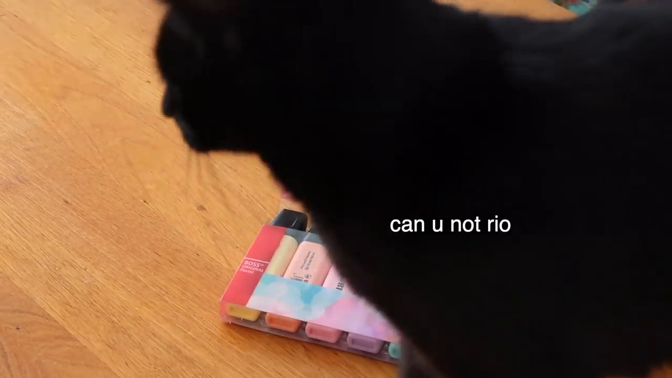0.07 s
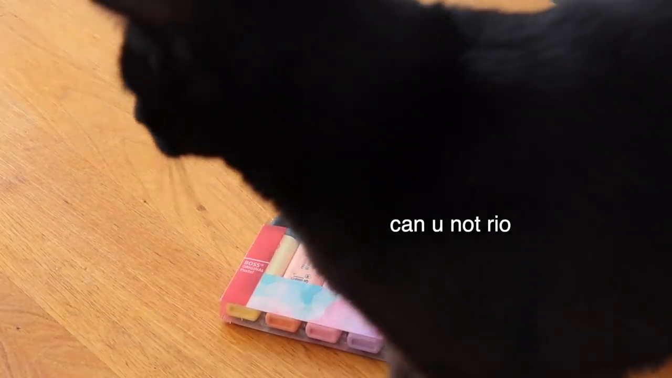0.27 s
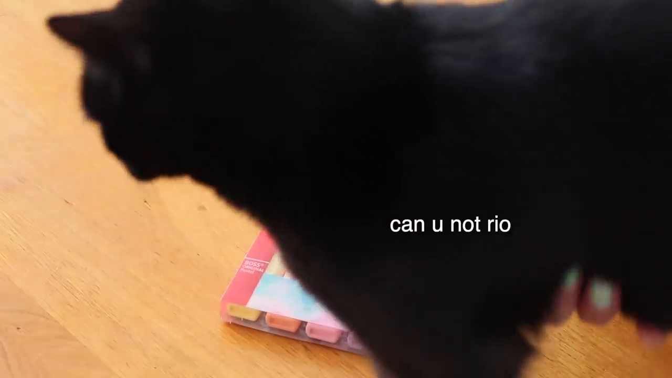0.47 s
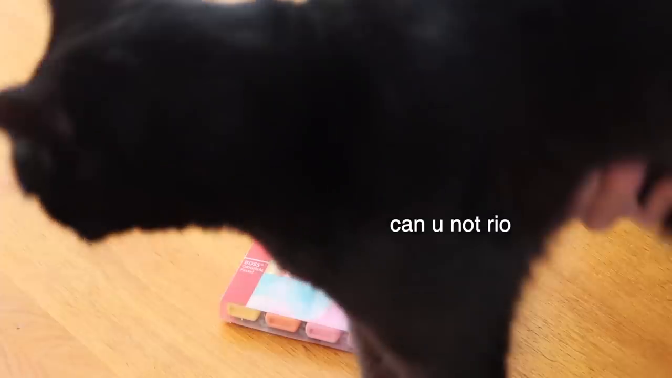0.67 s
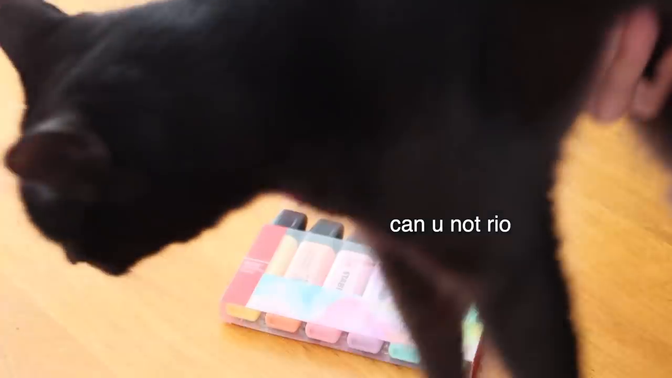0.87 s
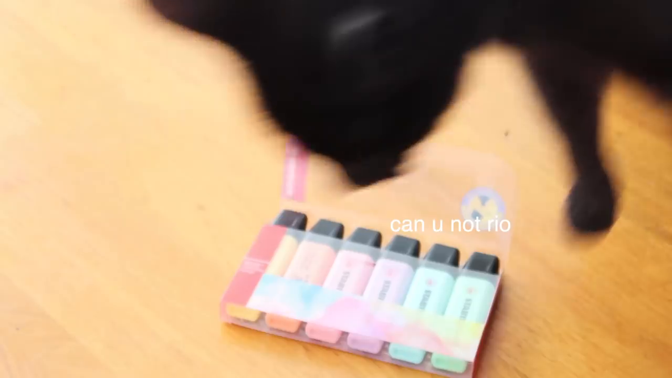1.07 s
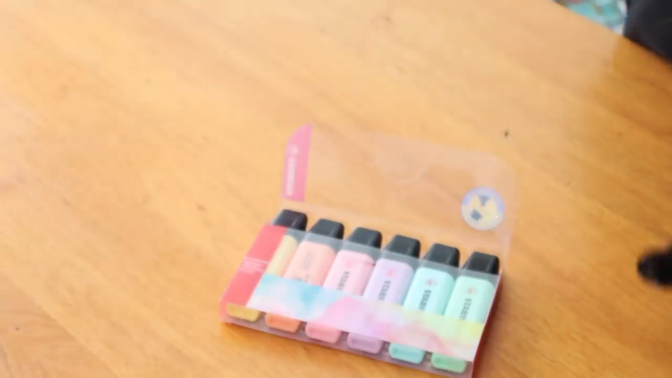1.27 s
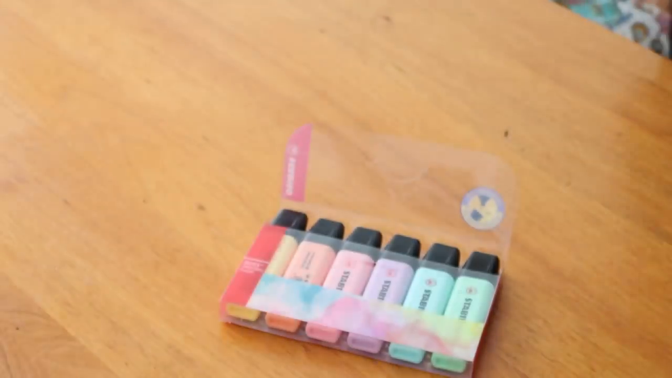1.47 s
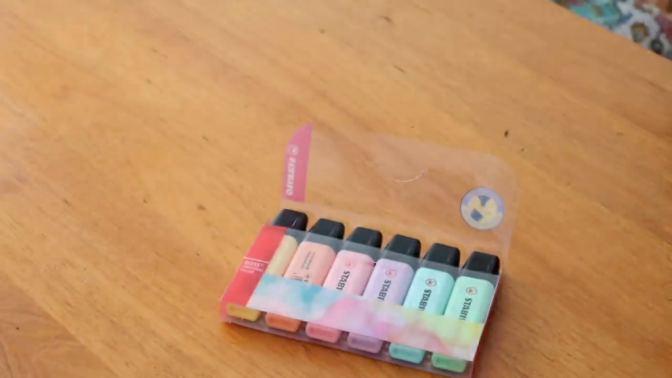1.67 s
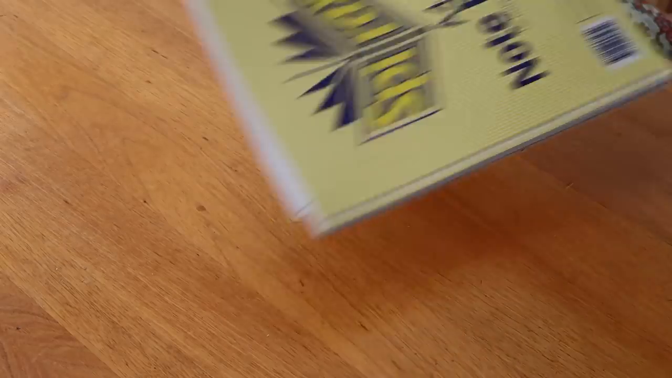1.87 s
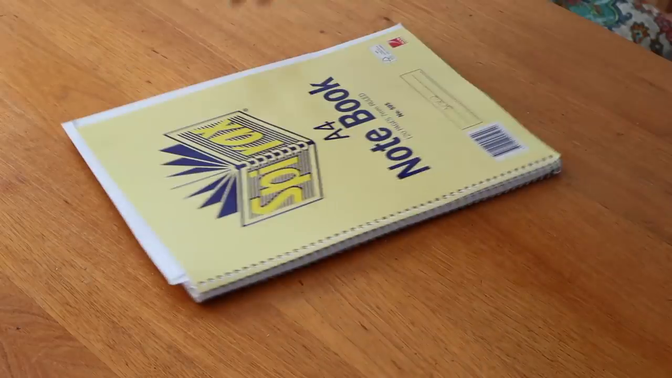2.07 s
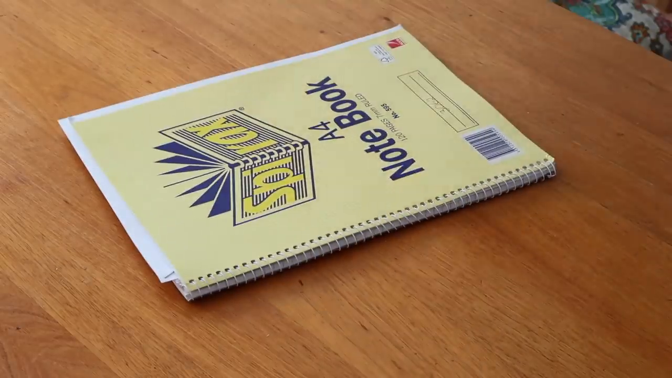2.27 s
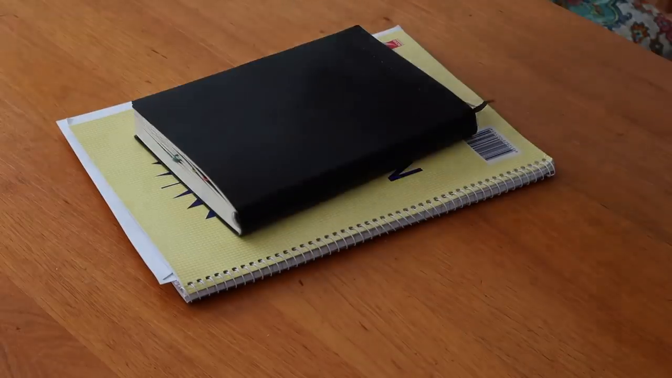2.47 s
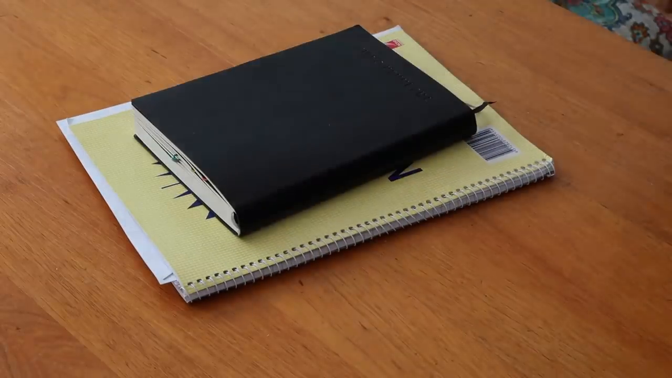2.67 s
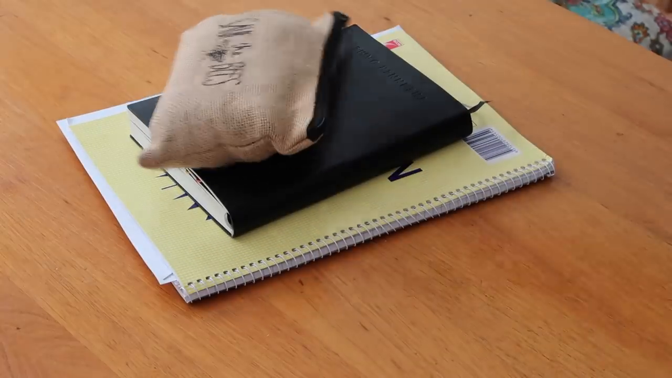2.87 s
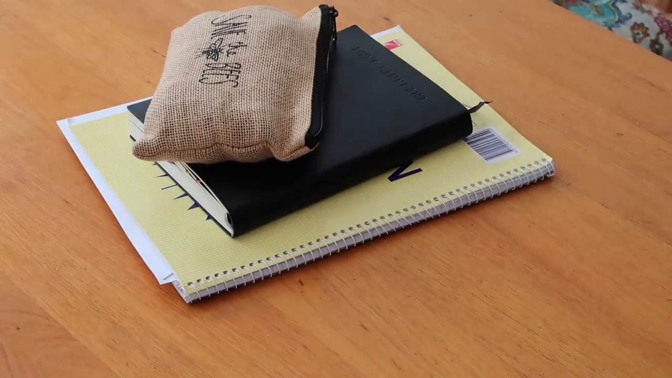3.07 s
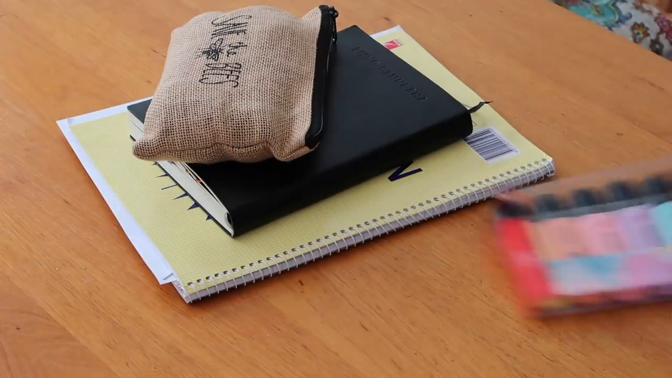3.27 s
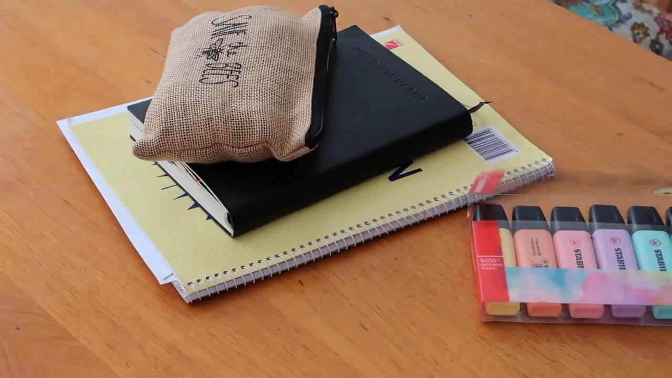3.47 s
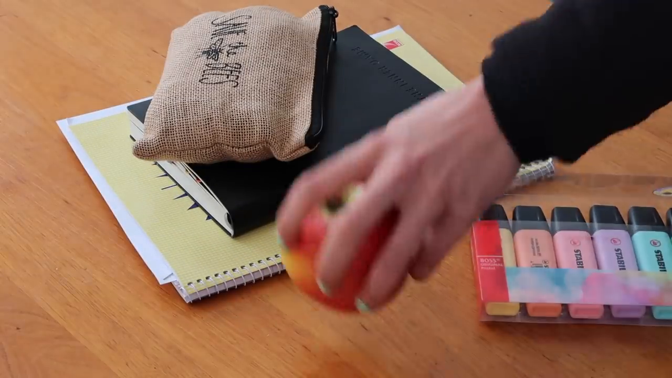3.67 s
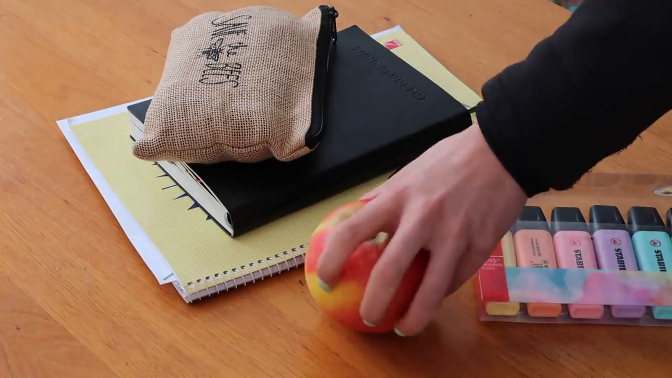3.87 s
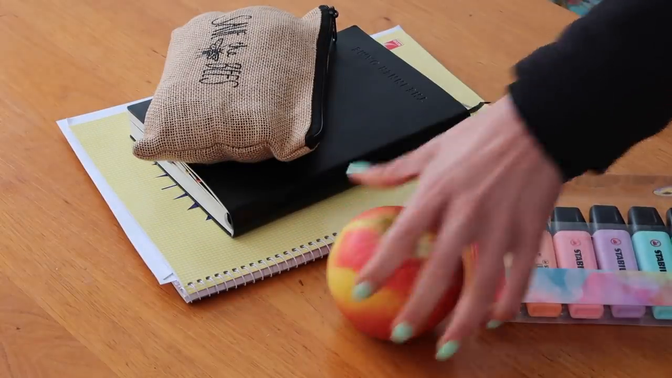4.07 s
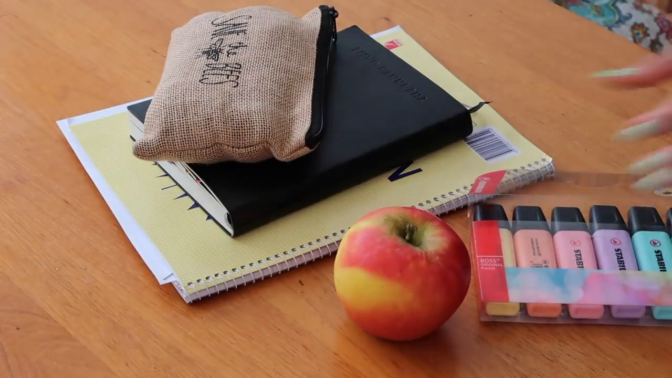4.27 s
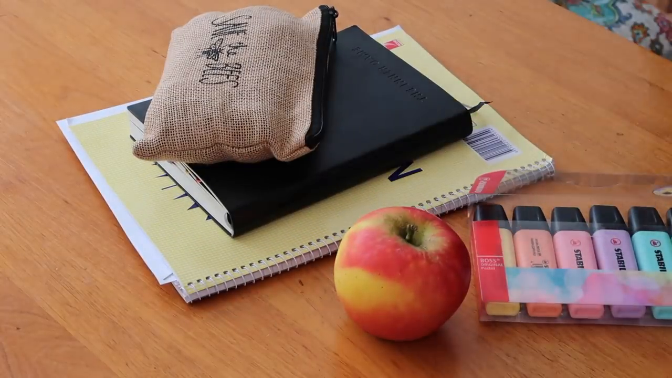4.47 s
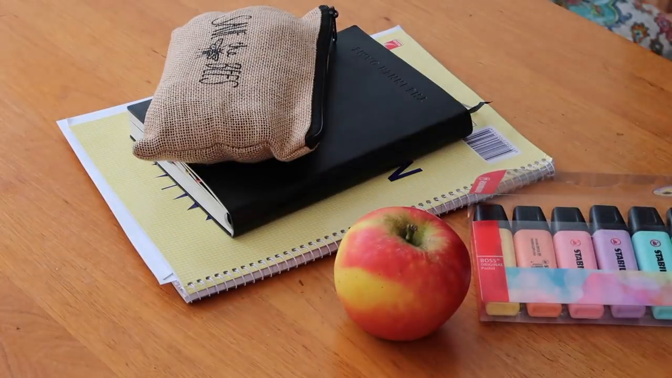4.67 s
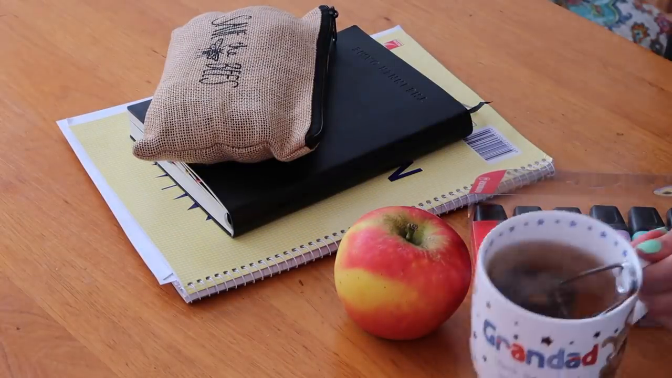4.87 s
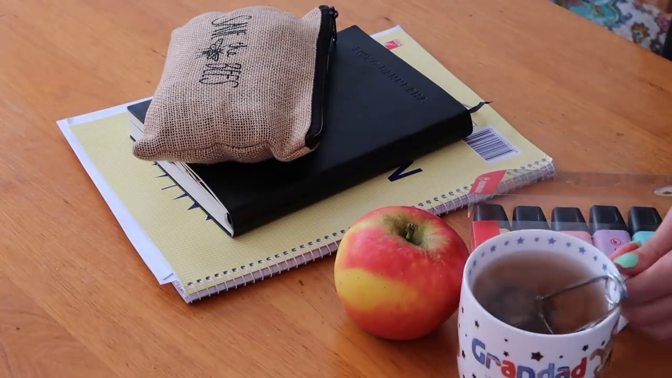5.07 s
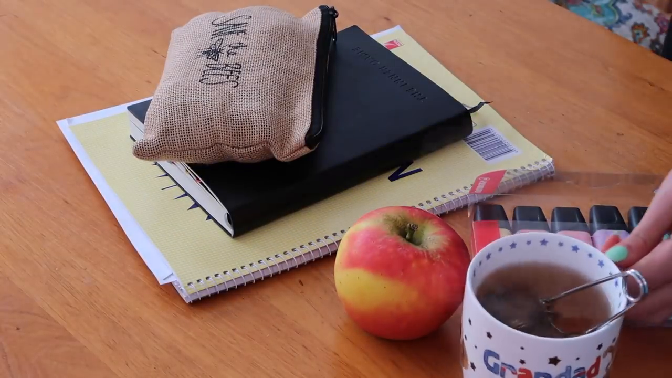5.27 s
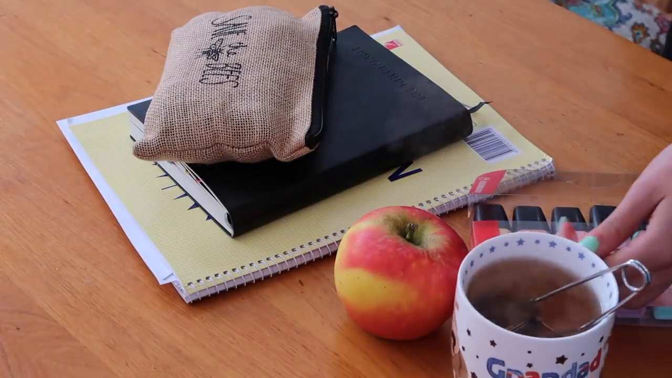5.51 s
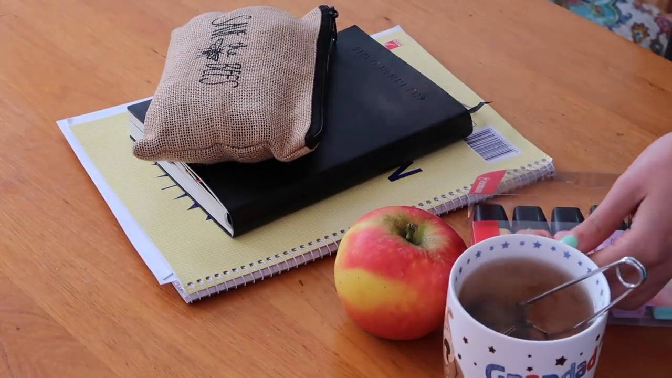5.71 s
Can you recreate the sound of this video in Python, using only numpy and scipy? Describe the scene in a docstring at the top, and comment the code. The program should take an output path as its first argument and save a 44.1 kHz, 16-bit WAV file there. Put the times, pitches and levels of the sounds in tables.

```python
"""Over quiet room air, fur and cloth rustle, a faint squeak rises and a cat leaves a wooden table with a thump.
A low hum sets in; a spiral notebook, a hardback, a pouch of pencils and a plastic case of markers are put down.
An apple lands and rocks to rest, the table is bumped, and a mug of tea lands with a very faint high hiss. Each
blow is a coloured click with a rattle; it rings modes of the table top and fills a small live room. Air and
rustle are coloured noise, the squeak is fuzzy harmonics and the hum is a sine."""
import sys
import numpy as np
from scipy import signal
from scipy.fft import rfft, irfft
from scipy.io import wavfile
from scipy.ndimage import uniform_filter1d

SR = 44100
rng = np.random.default_rng(int(sys.argv[2]) if len(sys.argv) > 2 else 0)


def persist_wave(psi):
    """Save psi, clipped to +-1, as 16-bit WAV."""
    counts = np.round(np.clip(psi, -1, 1) * 32767).astype(np.int16)
    wavfile.write(sys.argv[1], SR, np.atleast_2d(counts).T)


N = 253134

# Colours of the room air and of brushing fur and cloth.
# Each row: frequency in Hz, relative level in dB per Hz.
AIR_COLOUR = [(15, -40), (25, -2), (193, 1), (399, -7), (445, -6.5), (537, -10.5), (648, -10.5),
              (782, -14.5), (1490, -14.5), (5580, -26), (10600, -37), (13500, -48.5), (15500, -84.5)]
BRUSH_COLOUR = [(200, -22), (350, -1.5), (700, 4.5), (2600, 4.5), (4500, -3.5), (7000, -11), (10000, -21.5),
                (13000, -23.5), (15500, -54)]
# Stereo width of room air and rustle. Each row: frequency in Hz, side minus mid in dB.
AIR_WIDTH = [(60, -24), (110, -21), (200, -10.5), (380, -2), (700, -4.5), (1290, -5.5), (2380, -7),
             (4400, -1), (8120, 1.5), (15000, 13)]
# Loudness of a low machine hum. Each row: time in seconds, rms level in dB.
HUM_LEVEL = [(1.85, -46.5), (3.0, -48.5), (3.7, -44.5), (4.9, -42), (5.3, -53)]
# Strokes of fur, sleeves and cloth.
# Each row: peak time in seconds, level in dB, rise in seconds, fall in seconds.
STROKES = [(.05, -52, 0.072, 0.037), (.35, -47.5, 0.13, 0.14), (.72, -59, .03, 0.058),
           (1.33, -46, 0.29, 0.15), (1.73, -51, 0.086, 0.19), (2.66, -50, 0.022, 0.16),
           (2.828, -41, 0.019, 0.017), (4.6, -44, 0.12, .08), (4.8, -50.5, 0.056, 0.095),
           (5.06, -55, 0.061, 0.044)]
# A faint rising squeak, perhaps from the cat as it is lifted.
# Each row: time in seconds, pitch in Hz, level in dB.
SQUEAK_GLIDE = [(.84, 419, -59.5), (.92, 463, -53.5), (.97, 487.5, -46.5), (1.02, 537, -46.5),
                (1.12, 573, -55.5), (1.2, 595, -72.5)]

# Stereo width of the reflections. Each row: frequency in Hz, side minus mid in dB.
ROOM_WIDTH = [(60, -39), (110, -44.5), (200, -24), (380, -20.5), (700, -22.5), (1290, -18), (2380, -13.5),
              (4400, -4.5), (8120, 3.5), (15000, 20)]
# Decay of the room. Each row: frequency in Hz, time to fall 60 dB in seconds.
ROOM_T60 = [(100, 0.2), (260, 0.57), (700, 0.51), (1800, 0.45), (5000, 0.47), (12000, 0.31)]
# Modes of the table top, before each object's own drive level.
# Each row: frequency in Hz, gain at the peak in dB, time to fall 60 dB in seconds.
TABLE_MODES = [(110.6, 12.5, 0.51), (141.5, -4, 1), (179.4, -4.5, 0.19), (245.8, -3.5, 0.17),
               (274.2, 1, 0.36), (365.6, 2, 0.081), (437.2, 4.5, 0.25), (519, -2.5, 0.36), (573, 0.5, .3),
               (703, -2, 0.93), (784, 1, 0.3), (913, -4, 0.21), (984, -9.5, 0.56)]

# Colour of each object's blow, before its brightness tilt.
# Each row: frequency in Hz, relative level in dB per Hz.
CAT_COLOUR = [(21, -33), (35, -3), (119, 16), (147, -19), (209, -47), (300, -33), (390, -51.5), (660, -120)]
NOTEBOOK_EDGE_COLOUR = [(47, -40), (80, -12), (205, -2.5), (441, -1.5), (669, -2), (1440, -9.5),
                        (1680, -11.5), (3170, -12.5), (3540, -17.5), (12300, -41.5), (15000, -51)]
NOTEBOOK_SLAP_COLOUR = [(60, -40), (170, -12), (240, -32), (440, -11), (590, -7), (800, -15.5),
                        (1300, -2.5), (1800, -2.5), (2400, -7.5), (3100, -8.5), (4200, -15.5),
                        (5800, -14.5), (11000, -29.5), (15500, -50)]
NOTEBOOK_CRACK_COLOUR = [(200, -22), (800, -12.5), (1600, -16.5), (2050, -4.5), (2340, 1), (2700, -6.5),
                         (3600, -16), (4600, -24), (5340, -18), (6200, -24), (11000, -32.5), (15500, -29)]  # the cover cracks against the wood
HARDBACK_EDGE_COLOUR = [(35, -14.5), (60, -6.5), (156, 5.5), (253, -4), (721, -9.5), (1630, -18.5),
                        (2910, -25), (3190, -27), (3500, -26), (4630, -29), (5980, -39.5), (12900, -52),
                        (15500, -57)]
HARDBACK_FLAT_COLOUR = [(29, -46), (50, -20.5), (114, 0.5), (238, -2), (313, -6), (462, -5.5), (568, -18),
                        (839, -19), (1300, -20.5), (1790, -27), (2010, -28), (5020, -54), (9110, -88),
                        (9760, -81), (12000, -63), (15600, -100), (22000, -120)]
POUCH_COLOUR = [(41, -38.5), (70, -6.5), (103, -10), (135, -14.5), (222, -7.5), (350, -15.5), (449, -4),
                (515, -15.5), (740, -13), (971, -20), (1220, -12.5), (2350, -3.5), (6240, -16.5),
                (13200, -23), (15800, -47)]
CASE_CORNER_COLOUR = [(90, -23.5), (200, -13), (380, -5), (1000, -6.5), (1300, -2), (1550, 2), (1900, -5.5),
                      (2400, -6), (3100, -15), (5200, -22.5), (8000, -34.5), (13000, -38.5), (15500, -55)]
CASE_FLAT_COLOUR = [(53, -46.5), (90, -19.5), (216, -16), (354, -7), (532, -5.5), (592, -2), (645, -8.5),
                    (688, -6.5), (1170, -10.5), (1310, -9), (2330, -12), (5850, -26), (10200, -38.5),
                    (12400, -34), (15000, -72)]
CASE_LID_COLOUR = [(2500, -35), (4200, -5), (5000, -0.5), (6300, -4), (7000, -33.5), (12000, -15.5),
                   (16000, -25)]
APPLE_COLOUR = [(35, -34.5), (70, -17.5), (105, -4.5), (155, -3), (210, -11.5), (290, -15), (380, -23.5),
                (520, -23.5), (860, -37), (1400, -40), (2200, -50.5), (3700, -63), (7000, -78.5)]
APPLE_ROCK_COLOUR = [(45, -37), (90, -8), (180, -4), (230, -17.5), (370, -21), (520, -27), (900, -40.5),
                     (1400, -46.5), (2500, -54.5), (5000, -76)]
BUMP_COLOUR = [(35, -45), (60, -29), (109, 4), (206, -26), (249, -12.5), (339, -29.5), (1290, -40),
               (2000, -39), (2600, -58), (4400, -120)]
MUG_COLOUR = [(50, -48), (110, -14), (175, -6.5), (215, -11), (260, 0), (400, -4.5), (620, -5), (880, -6.5),
              (1050, -13), (1400, -14.5), (2000, -23.5), (2600, -30.5), (3100, -43), (5000, -65),
              (8000, -85)]
HIGH_HISS_COLOUR = [(4500, -29), (5100, 4), (5850, -4), (6700, -29), (8500, -6), (11000, -14), (14500, -10),
                    (16000, -37)]
# The blows; flat things touch with an edge, then fall flat.
# Each row: start in seconds, level of the main contact in dB, brightness in dB per octave,
# rattle in dB relative to the main contact, what lands.
BLOWS = [ (1.378, -34.5, 8.5, -11.5, "cat"), (1.392, -43, -23, 4, "cat"),
         (1.987, -48, 3, -3, "notebook edge"), (2.031, -35, 1.5, 3, "notebook edge"),
         (2.046, -35.5, 1.5, 3.5, "notebook edge"), (2.120, -27.5, -4.5, 1.5, "notebook slap"),
         (2.1237, -24.5, -0.5, -12, "notebook slap"), (2.1283, -19.5, .5, 1.5, "notebook slap"),
         (2.1272, -13.5, -0.5, -4.5, "notebook crack"), (2.446, -24.5, 1.5, 4.5, "hardback edge"),
         (2.457, -20.5, 1, -5.5, "hardback edge"), (2.4855, -21.5, -0.15, -3, "hardback edge"),
         (2.4872, -11.5, 0, -16, "hardback flat"), (2.499, -15, -1.2, -6.5, "hardback flat"),
         (2.844, -22, -1, 2, "pouch"), (2.8515, -20, 0, 4.5, "pouch"), (2.8595, -17.5, 1.2, 0.5, "pouch"),
         (3.031, -35, 1.5, 2.5, "pouch"), (3.185, -39.5, 0.5, 1, "case corner"),
         (3.2376, -21.5, 1, -2, "case corner"), (3.253, -30, .5, 6, "case corner"),
         (3.314, -29.5, -0.1, 0.5, "case corner"), (3.356, -30, 2.5, 3.5, "case corner"),
         (3.3705, -23, -1, -17.5, "case lid"), (3.3708, -18.5, -2, 3.5, "case flat"),
         (3.392, -23, -0.5, 6, "case flat"), (3.424, -20, 1, -2.5, "case flat"),
         (3.827, -14.5, 0.9, -8.5, "apple"), (3.834, -12.5, -0.05, -4, "apple"),
         (3.855, -15.5, .4, -19.5, "apple"), (3.889, -21, 0.45, -9.5, "apple"), (4.28, -35, 1, -2, "apple"),
         (4.793, -27.5, 0, 0.5, "table bump"), (4.822, -34, 0.5, -5, "table bump"),
         (4.85, -39, -1, -8, "table bump"), (5.0936, -7, 0.8, -12, "mug"), (5.096, -20, 0.6, -5.5, "mug"),
         (5.1068, -19, -0.4, -14, "mug"), (5.126, -24, 0.5, 4.5, "mug"), (5.145, -25.5, -2.5, -2, "mug"),
         (5.164, -57.5, 2, 2, "infuser"), ]

AIR_DB = -50.5
HUM_HZ, HUM_START_S = 48.8, 1.825
# the apple rocks to rest, each swing shorter and weaker than the one before
ROCK_START_S, ROCK_GAP_S = 4.131, 0.17
ROCK_SHRINK = 0.88  # each gap as a share of the one before
ROCK_DB, ROCK_LOSS_DB = -25, 7.5  # first swing, and loss per swing
ROCK_LOBE_S = 0.036  # from the first lobe's touch to the second
ROCK_TILT_DB, ROCK_LOBE_TILT_DB = 0.45, -1.4  # dB per octave; the second touch is duller
ROCK_RATTLE_DB = -4
BAND_LIMIT_HZ = 15900


def amp(db):
    """Decibels to gain."""
    return 10 ** (np.asarray(db) / 20)


def unit(x):
    """Scales to rms 1."""
    return x / np.sqrt(np.mean(x ** 2) + 1e-20)


def read(points, hz):
    """Reads a table on a log-frequency axis."""
    f, value = np.transpose(points)
    return np.interp(np.log(hz + 1), np.log(f + 1), value)


def add(mix, s, sound):
    """Adds a sound to the mix at time s."""
    start = max(round(s * SR), 0)
    part = mix[:, start:][:, :sound.shape[1]]
    part += sound[:, :part.shape[1]]


def diffuse(size, width):
    """White noise from all around at two close ports: alike in the bass, unlike in the treble."""
    mid, side = rng.standard_normal((2, size))
    hz = np.fft.rfftfreq(size, 1 / SR)
    side = irfft(rfft(side) * amp(read(width, hz)), size)
    return np.array([mid + side, mid - side])


def wash(colour):
    """Steady diffuse noise of a given colour."""
    hz = np.fft.rfftfreq(N, 1 / SR)
    spectrum = rfft(diffuse(N, AIR_WIDTH)) * amp(read(colour, hz))
    return unit(irfft(spectrum, N))


def background():
    """Room air as coloured noise, and a low sine hum that sets in."""
    t = np.arange(N) / SR
    s, db = np.transpose(HUM_LEVEL)
    hum = unit(np.sin(2 * np.pi * (HUM_HZ * t + rng.random())))
    hum *= amp(np.interp(t, s, db))
    fade_in = np.clip((t - HUM_START_S) / 0.02, 0, 1)
    return amp(AIR_DB) * wash(AIR_COLOUR) + hum * fade_in


def brushing(grain_db=0.87):
    """Fur and cloth: each stroke swells and fades while countless fibres slip, in small clumps."""
    t = np.arange(N) / SR
    strokes = np.zeros(N)
    for s, db, rise, fall in STROKES:
        spread = np.where(t < s, rise, fall)
        strokes += amp(db) * np.exp(-0.5 * ((t - s) / spread) ** 2)
    clumps = unit(uniform_filter1d(rng.standard_normal(N), size=300))
    return strokes * amp(grain_db * clumps) * wash(BRUSH_COLOUR)


def squeak(width_hz=43, octave_db=-5, third_db=-16):
    """A rising tone with two overtones, each made fuzzy by slow random modulation."""
    t = np.arange(N) / SR
    s, hz, db = np.transpose(SQUEAK_GLIDE)
    turn = np.exp(2j * np.pi * np.cumsum(np.interp(t, s, hz)) / SR)
    lowpass = signal.butter(2, width_hz, fs=SR, output="sos")
    a, b = signal.sosfilt(lowpass, rng.standard_normal((2, 3, N)))
    tone = np.zeros(N)
    for k, level_db in enumerate([0, octave_db, third_db]):
        fuzzy = (a[k] + 1j * b[k]) * turn ** (k + 1)
        tone += amp(level_db) * fuzzy.real
    return unit(tone) * np.interp(t, s, amp(db), left=0, right=0)


def room(room_db, lag, build=0.0015, size=32768, count=64, order=8):
    """Direct sound, lag samples later on the left, then reflections that die band by band."""
    hz, t, z = signal.stft(diffuse(size, ROOM_WIDTH), SR, nperseg=256)
    decay = amp(-60 * t / read(ROOM_T60, hz)[:, None])
    tail = rfft(signal.istft(z * decay, SR, nperseg=256)[1][:, :size])
    power = (abs(tail) ** 2).mean(0)
    tail /= np.sqrt(uniform_filter1d(power, count) + 1e-9)  # the walls favour no band
    age = np.arange(SR // 2) / SR
    tail = irfft(tail)[:, :len(age)] * (1 - np.exp(-(age / build) ** 2))
    out = amp(room_db) * tail / np.linalg.norm(tail[0])
    # windowless sinc pulses place the direct sound between samples
    out[:, :2 * order] += np.sinc(np.arange(-order, order) - np.array([[lag], [-lag]]) / 2)
    return out


def table_top(x):
    """The wooden top rings as a bank of damped resonators when x drives it."""
    out = np.zeros(N)
    for hz, db, t60 in TABLE_MODES:
        r = np.exp(-np.log(1000) / (t60 * SR))
        pole = r * np.exp(2j * np.pi * hz / SR)
        ring = signal.lfilter([1], [1, -pole], x + 1e-18).real
        out += amp(db) * 2 * (1 - r) * ring
    return out


def contact(colour, tilt_db, size=4096):
    """The causal (minimum-phase) click of one contact, of energy 1; harder contacts tilt brighter."""
    hz = np.fft.rfftfreq(size, 1 / SR)
    db = read(colour, hz) + tilt_db * np.log2(np.maximum(hz, 100) / 1000)
    log_gain = np.log(amp(np.maximum(db - db.max(), -100)))
    mirrored = np.r_[log_gain, log_gain[-2:0:-1]]
    click = np.fft.ifft(np.exp(signal.hilbert(mirrored).conj())).real
    return click / np.linalg.norm(click)


def scatter(spread, size=2048):
    """Smears a click over the time that waves take to cross the object, leaving its colour alone."""
    fade = np.exp(-np.arange(size) / SR / max(spread, 1e-4))
    burst = rfft(rng.standard_normal(size) * fade)
    for _ in range(6):
        flat = irfft(burst / (abs(burst) + 1e-9))
        flat[size // 2:] = 0  # nothing comes before the contact
        burst = rfft(flat)
    return flat[:size // 2]


def rattle(rattle_db, decay, settle_db, settle_s, per_s=1500):
    """One main contact, a dying scatter of small ones, and a slower swell as pages, pens or loose parts settle."""
    t = np.arange(SR // 2) / SR
    size, chance = rng.standard_normal(len(t)), rng.random(len(t))
    quick = np.exp(-t / max(decay, 1e-3))
    slow = t * np.exp(-t / max(settle_s, 1e-3))
    share = np.hypot(amp(rattle_db) * unit(quick), amp(settle_db) * unit(slow))
    force = size * (chance < per_s / SR) * share
    force *= np.hypot(amp(rattle_db), amp(settle_db)) / (np.linalg.norm(force) + 1e-9)
    force[0] += 1  # the main contact
    return force


def put_down(blows, colour, room_db, table_db, spread, decay, settle_db=-np.inf, settle_s=0, lag=0):
    """An object's blows sound into the room and drive the table; spread, decay and settle_s in seconds."""
    air, drive = np.zeros((2, N)), np.zeros((1, N))
    for s, db, tilt_db, rattle_db in blows:
        click = signal.fftconvolve(contact(colour, tilt_db), scatter(spread))
        blow = signal.fftconvolve(rattle(rattle_db, decay, settle_db, settle_s), click)[None]
        energy = 1 + amp(rattle_db) ** 2 + amp(settle_db) ** 2
        # the level is the main contact's rms over 10 ms
        blow *= amp(db) * np.sqrt(SR / 100 * energy) / np.linalg.norm(blow)
        add(drive, s, blow)
        add(air, s, signal.fftconvolve(blow, room(room_db, lag), axes=1))
    return air + amp(table_db) * table_top(drive[0])


def blows_of(name):
    """The blows of one object."""
    return [row[:-1] for row in BLOWS if row[-1] == name]


def rocking(count=3):
    """The apple touches down on two lobes at each swing, and loses energy every time."""
    gaps = ROCK_GAP_S * ROCK_SHRINK ** np.arange(count - 1)
    times = ROCK_START_S + np.r_[0, np.cumsum(gaps)]
    touches = []
    for swing, s in enumerate(times):
        for lobe in range(2):
            db = ROCK_DB - swing * ROCK_LOSS_DB
            tilt_db = ROCK_TILT_DB + lobe * ROCK_LOBE_TILT_DB
            touches.append((s + lobe * ROCK_LOBE_S, db, tilt_db, ROCK_RATTLE_DB))
    return touches


def scene():
    """Lays the objects over the background, rustle and squeak."""
    out = background() + brushing() + squeak()
    out += put_down(blows_of("cat"), CAT_COLOUR, room_db=-9, table_db=-6, spread=0.00088, decay=0.0086)
    out += put_down(blows_of("notebook edge"), NOTEBOOK_EDGE_COLOUR, room_db=6, table_db=9.5,
                    spread=0.0086, decay=0.0154, settle_db=3, settle_s=0.0065)
    out += put_down(blows_of("notebook slap"), NOTEBOOK_SLAP_COLOUR, room_db=-0.5, table_db=2,
                    spread=0.00072, decay=0.0023, settle_db=1, settle_s=0.013, lag=0.94)
    out += put_down(blows_of("notebook crack"), NOTEBOOK_CRACK_COLOUR, room_db=-6, table_db=-9,
                    spread=0.00043, decay=0.00038, lag=0.76)
    out += put_down(blows_of("hardback edge"), HARDBACK_EDGE_COLOUR, room_db=-2.5, table_db=-2,
                    spread=0.0015, decay=0.0062, settle_db=0.5, settle_s=0.0048)
    out += put_down(blows_of("hardback flat"), HARDBACK_FLAT_COLOUR, room_db=-3, table_db=-1.5,
                    spread=0.00067, decay=0.0055, settle_db=-20, settle_s=0.023)
    out += put_down(blows_of("pouch"), POUCH_COLOUR, room_db=0.5, table_db=5,
                    spread=0.0022, decay=0.017, settle_db=-9, settle_s=0.044)
    out += put_down(blows_of("case corner"), CASE_CORNER_COLOUR, room_db=3, table_db=-14.5,
                    spread=0.002, decay=0.0067, settle_db=-1, settle_s=0.017, lag=1.46)
    out += put_down(blows_of("case lid"), CASE_LID_COLOUR, room_db=-3.5, table_db=-13,
                    spread=0.00096, decay=0.0012, lag=1.2)
    out += put_down(blows_of("case flat"), CASE_FLAT_COLOUR, room_db=-0.5, table_db=-1,
                    spread=0.0076, decay=0.014, settle_db=-9, settle_s=0.068, lag=1.6)
    out += put_down(blows_of("apple"), APPLE_COLOUR, room_db=2, table_db=0.5, spread=0.0038, decay=0.0074)
    out += put_down(rocking(), APPLE_ROCK_COLOUR, room_db=1, table_db=-1,
                    spread=0.0042, decay=0.0064, settle_db=-0.5, settle_s=0.01)
    out += put_down(blows_of("table bump"), BUMP_COLOUR, room_db=-9, table_db=-14,
                    spread=0.012, decay=0.019, settle_db=5, settle_s=0.013)
    out += put_down(blows_of("mug"), MUG_COLOUR, room_db=-1, table_db=2.5, spread=0.0014, decay=0.013)
    out += put_down(blows_of("infuser"), HIGH_HISS_COLOUR, room_db=9, table_db=-17, spread=0.0036, decay=0.06)
    return out


def record(dry):
    """The hardest knocks overload the input, which bends them smoothly; then a steep low-pass."""
    clipped = dry / (1 + dry ** 8) ** (1 / 8)
    lowpass = signal.firwin(511, BAND_LIMIT_HZ, window=("kaiser", 9), fs=SR)
    return signal.oaconvolve(clipped, lowpass[None], "same")


dry = scene()
out = record(dry)
persist_wave(out)
```